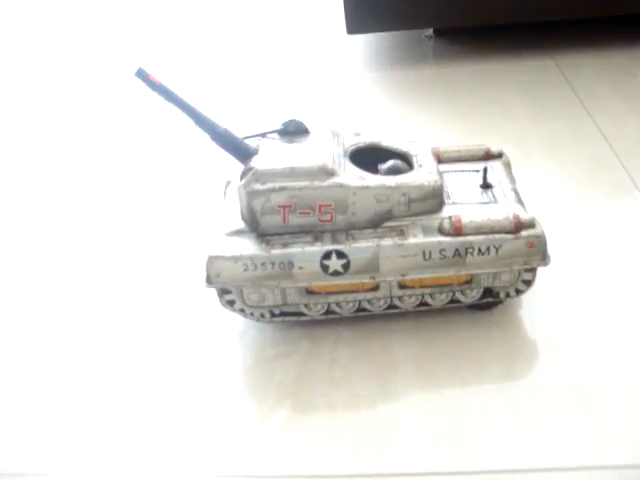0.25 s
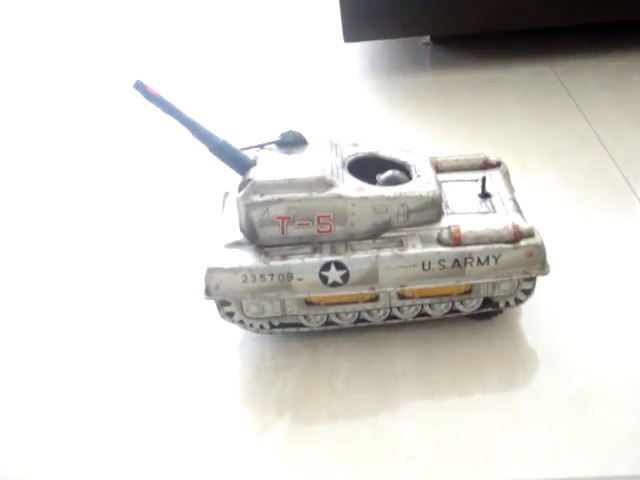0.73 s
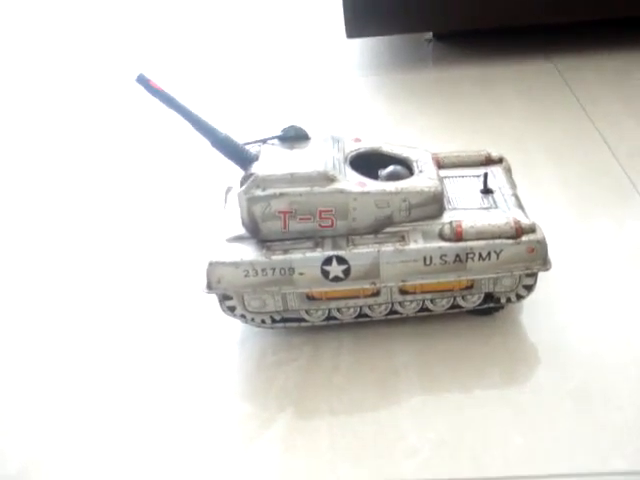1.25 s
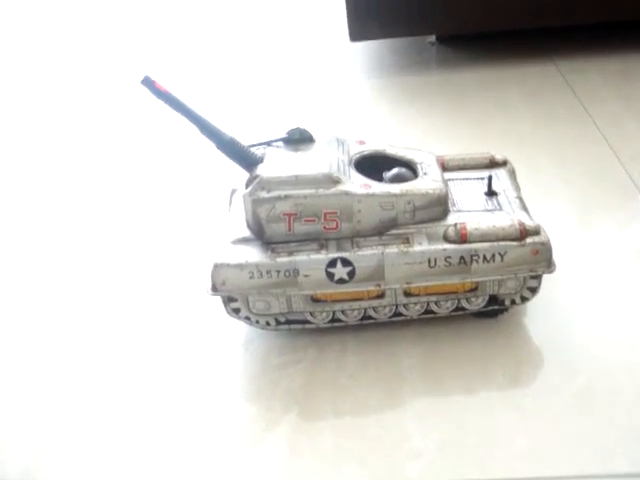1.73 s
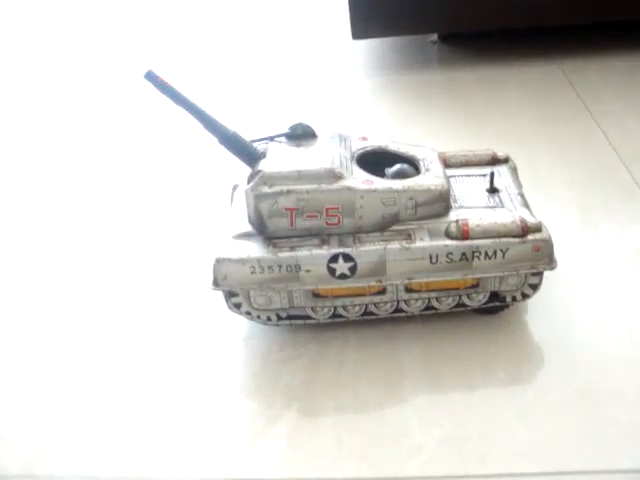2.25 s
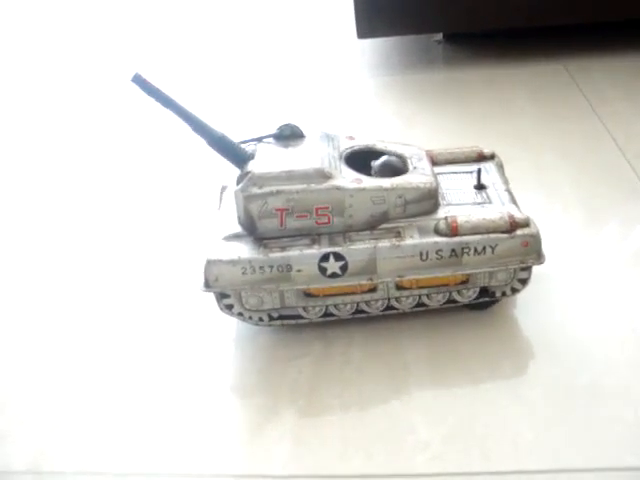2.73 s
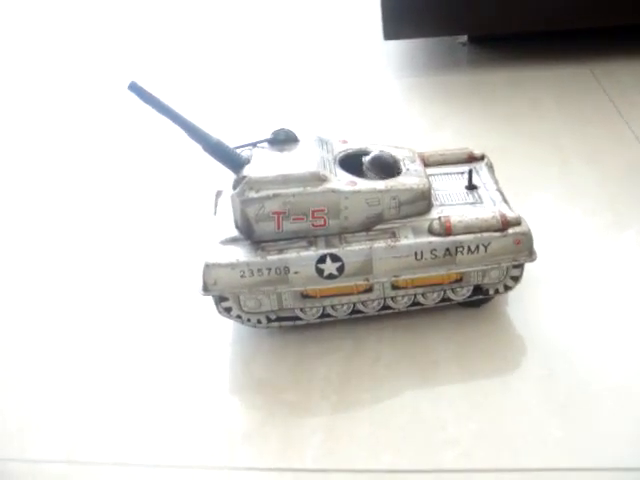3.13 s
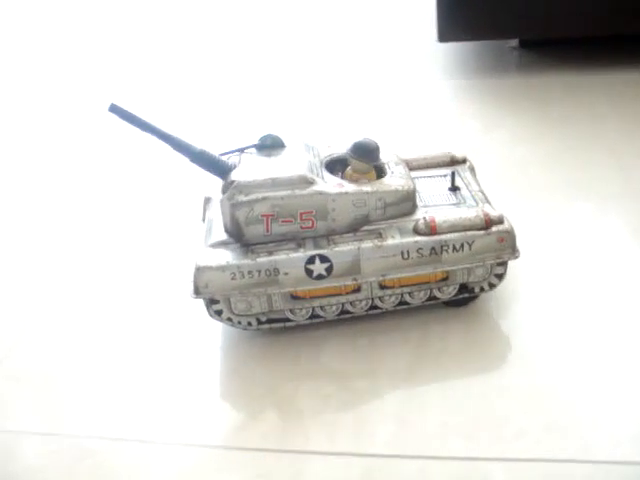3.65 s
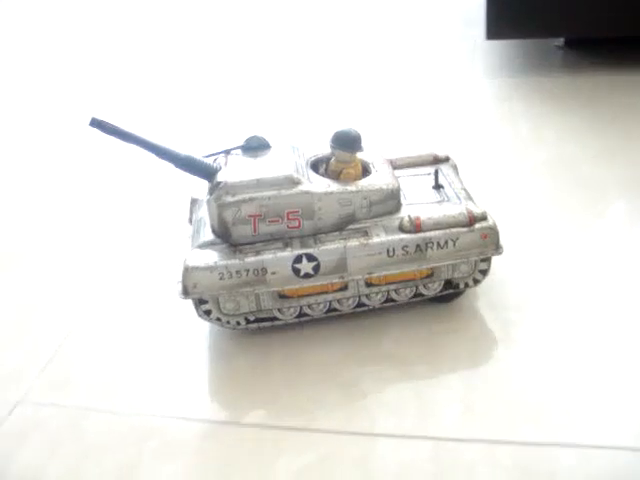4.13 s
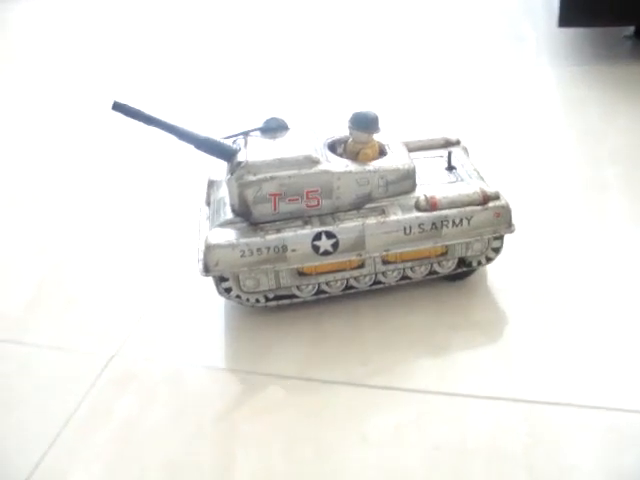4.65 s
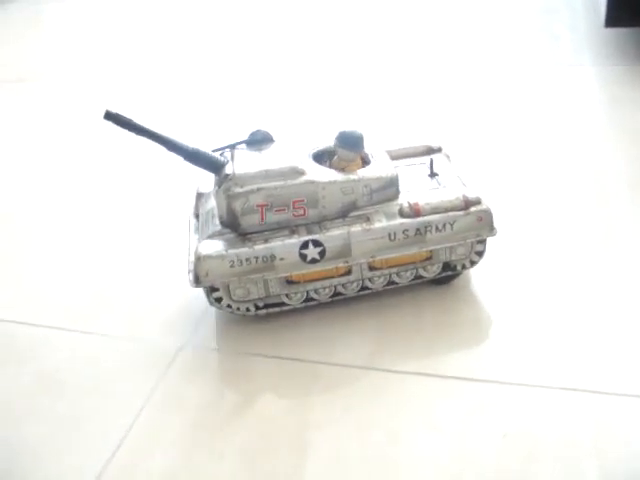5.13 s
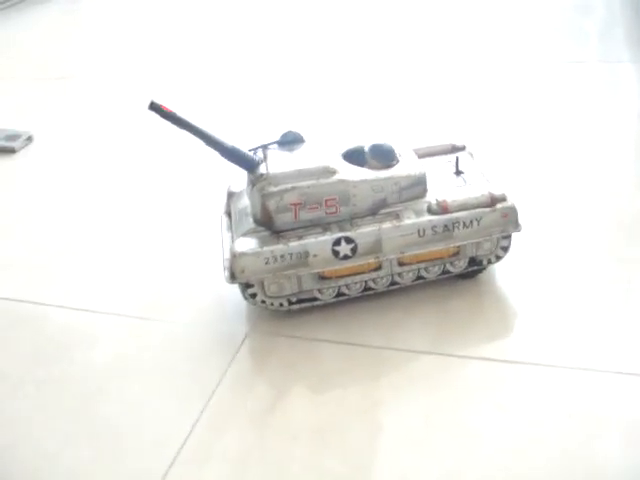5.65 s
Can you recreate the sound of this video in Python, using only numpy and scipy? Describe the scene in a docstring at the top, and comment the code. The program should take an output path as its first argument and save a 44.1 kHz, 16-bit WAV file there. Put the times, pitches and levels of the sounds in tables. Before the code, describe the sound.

A wind-up tin tank runs on a hard floor, miked very close in a quiet room with faint rumble. About sixteen bright ratchet clicks a second ring in the hollow hull, then lift off; after a brief lull, raspy gears whirr louder and louder with a wavering whine, dip with a small clunk, recover, and the loud clicking returns.

```python
"""A tin toy tank drives over a hard floor, close to a small microphone in a room with a faint rumble.
At first a pawl snaps against the tin hull about sixteen times a second, exciting its damped modes.
Then it lifts off with a clunk; gears rasp free and whirr, a noise of tooth contacts growing ever louder.
A wheel whines at its tooth rate and the hull bumps softly; the drive clunks and slackens briefly.
At last the pawl catches again, hard enough to overload the microphone."""
import sys
import numpy as np
from scipy import signal
from scipy.fft import rfft, irfft, next_fast_len
from scipy.io import wavfile
from scipy.ndimage import uniform_filter1d, map_coordinates

SR = 44100
rng = np.random.default_rng(int(sys.argv[2]) if len(sys.argv) > 2 else 0)


def int16_out(signal):
    """Quantize to a 16-bit WAV file."""
    q = np.round(np.clip(np.atleast_2d(signal).T, -1, 1) * 32767)
    wavfile.write(sys.argv[1], SR, q.astype(np.int16))


N = 260180
TOP_HZ = 10080  # upper band limit of the microphone


def amp(db):
    """The decibel law: a level in dB becomes an amplitude gain."""
    return 10 ** (np.asarray(db) / 20)


def unit(x):
    """Normalisation by effective value: x at rms 1."""
    return x / np.sqrt(np.mean(x ** 2) + 1e-20)


def along(points, hz):
    """Logarithmic frequency scale: interpolates (frequency [Hz], value) points at hz."""
    f, v = np.transpose(points)
    return np.interp(np.log(hz + 1), np.log(f + 1), v)


def wobble(rate):
    """Band-limited fluctuation: a smooth random curve with rate knots a second."""
    knots = rng.standard_normal(int(N * rate / SR) + 4)
    return map_coordinates(knots, [np.arange(N) * rate / SR])


def filtered(x, response):
    """Linear filtering: the spectrum of x times a response of frequency."""
    m = next_fast_len(len(x) + 4096)
    hz = np.fft.rfftfreq(m, 1 / SR)
    return irfft(rfft(x, m) * response(hz), m)[:len(x)]


def resonance(hz, centre, width):
    """Damped resonance: the complex response of one mode."""
    return 1j * hz * width / (centre ** 2 - hz ** 2 + 1j * hz * width)


def body(modes, hz):
    """Modal superposition: (frequency [Hz], width [Hz], level [dB]) modes summed with alternating sign."""
    return sum((-1) ** k * amp(db) * resonance(hz, c, w) for k, (c, w, db) in enumerate(modes))


def add(track, s, sound):
    """Superposition in time: mixes a sound into the track from time s on."""
    start = int(np.clip(round(s * SR), 0, N))
    track[start:start + len(sound)] += sound[:N - start]


def ramp(start, length):
    """Linear transition: rises from 0 to 1 over length seconds."""
    return np.clip((np.arange(N) / SR - start) / length, 0, 1)


def travelling(x, patch_db):
    """Moving interference: narrow bands lift and sink, as reflections shift while the toy moves."""
    z = signal.stft(x, nperseg=2048)[2]
    field = uniform_filter1d(rng.standard_normal(z.shape), size=3, axis=0)  # smooth over frequency
    field = uniform_filter1d(field, size=11, axis=1)  # smooth over time
    return unit(signal.istft(z * amp(patch_db * unit(field)), nperseg=2048)[1][:N])


# low rumble of the room and the rolling toy: (frequency [Hz], spectral level [dB per Hz])
RUMBLE_SPECTRUM = [(25, 3), (55, 3.5), (90, -2.5), (170, 0), (450, -0.5), (1000, -31), (4000, -28.5)]


def room(room_db=-70):
    """Stationary noise: the faint, steady rumble of the room."""
    noise = rng.standard_normal(N)
    return amp(room_db) * unit(filtered(noise, lambda hz: amp(along(RUMBLE_SPECTRUM, hz))))


# the drive slackens once: (start [s], fall [s], recovery [s], depth [dB])
SLACKENING = (5.35, 0.08, 0.25, 8.5)


def slack():
    """Transient loss of drive: how far the drive has slackened (dB)."""
    start, fall, recovery, depth_db = SLACKENING
    return depth_db * (ramp(start, fall) - ramp(start + fall, recovery))


# the pawl lifts off, the gears run free, the pawl catches again (s); time to change state (s)
LIFT_S, FREE_S, CATCH_S, ENGAGE_S = 2.3, 2.481, 5.69, 0.007
# tooth hiss while the pawl holds the gears, while they coast unloaded, as they start to run free (dB)
HELD_DB, COAST_DB, FREE_DB = -58, -42.5, -30.5
SWELL_DB_PER_S = 4.5  # growth of the hiss in the free run, up to the slackening
BRAKE_DB = -5  # the returning pawl slows the gears
# hull drone: level before and at the start of the free run (dB), growth, share of the slackening
DRONE_HELD_DB, DRONE_FREE_DB, DRONE_DB_PER_S, DRONE_SLACK = -45.5, -44.5, 4.5, 0.34
# share of hard running: under the pawl's load, once it has lifted, and growth per second of free run
EFFORT_HELD, EFFORT_FREE, EFFORT_PER_S = 1, 0.041, 0.05


def running():
    """Load dependence: tooth hiss (dB), hull drone (dB) and effort in each state of the gears."""
    run_s = np.clip(np.arange(N) / SR - FREE_S, 0, SLACKENING[0] - FREE_S)
    lifted, free, caught = ramp(LIFT_S, ENGAGE_S), ramp(FREE_S, ENGAGE_S), ramp(CATCH_S, ENGAGE_S)
    slack_db = slack()
    idle_db = HELD_DB + (COAST_DB - HELD_DB) * lifted
    hiss_db = (1 - free) * idle_db + free * (FREE_DB + SWELL_DB_PER_S * run_s) - slack_db
    free_drone_db = DRONE_FREE_DB + DRONE_DB_PER_S * run_s
    hull_db = (1 - free) * DRONE_HELD_DB + free * free_drone_db - DRONE_SLACK * slack_db
    effort = (1 - lifted) * EFFORT_HELD + lifted * (EFFORT_FREE + EFFORT_PER_S * run_s)
    return hiss_db + BRAKE_DB * caught, hull_db + BRAKE_DB * caught, np.clip(effort, 0, 1)


def teeth(rate=7000, spread_db=-0.5):
    """Shot noise: countless tiny tooth contacts of uneven size, rate a second on average."""
    hit = rng.random(N) < rate / SR
    return unit(hit * rng.standard_normal(N) * amp(spread_db * rng.standard_normal(N)))


# gear colour when running lightly: (frequency [Hz], spectral level [dB per Hz])
LIGHT_COLOUR = [(650, -48), (1100, -13), (1480, -15), (1860, -8.5), (2390, -11.5), (2900, -11.5),
                (4080, -9.5), (4650, -8.5), (5050, -7.5), (6480, -6.5), (8160, -4), (9200, -6),
                (10000, -15.5), (13000, -60), (22000, -120)]
# gear colour when running hard: (frequency [Hz], spectral level [dB per Hz])
HARD_COLOUR = [(650, -24), (1100, -6), (1400, 6), (1520, -2.5), (1860, 5.5), (2040, -6), (2850, -1),
               (3460, 11), (4320, -6.5), (4650, -14.5), (6720, -4), (8390, -21), (10000, -11), (13000, -43),
               (22000, -120)]
# tin panel resonances under the gears: (frequency [Hz], width [Hz], lift [dB])
PANEL_MODES = [(2030, 42, -6), (3300, 96, -4), (4570, 280, 6.5), (5210, 160, 4.5), (6100, 200, 3.5),
               (8380, 110, 6)]
# the hollow of the hull: (frequency [Hz], width [Hz], level [dB])
HOLLOW_MODES = [(294, 90, -22.5), (601, 38, -8.5), (678, 36, -10), (752, 69, -9), (827, 53, -1),
                (905, 99, -2.5), (1050, 46, -5.5)]


def gears(light_db=0, hard_db=0, drone_db=-1, rumble_db=-35, flutter_db=0.5, grain_db=0.7):
    """Forced vibration: tooth contacts excite the panels and hollow of the hull, fuller when running hard."""
    hiss_db, hull_db, effort = running()

    def panels(hz):
        return amp(sum(db * np.abs(resonance(hz, c, w)) ** 2 for c, w, db in PANEL_MODES))

    contacts = filtered(travelling(teeth() + rng.standard_normal(N), patch_db=3.0), panels)
    light = unit(filtered(contacts, lambda hz: amp(along(LIGHT_COLOUR, hz))))
    hard = unit(filtered(contacts, lambda hz: amp(along(HARD_COLOUR, hz))))
    mesh = amp(light_db) * (1 - effort) * light + amp(hard_db) * effort * hard
    hull = travelling(filtered(teeth(), lambda hz: body(HOLLOW_MODES, hz)), patch_db=4.0)
    rumble = filtered(rng.standard_normal(N), lambda hz: amp(along(RUMBLE_SPECTRUM, hz)))
    rumble = travelling(rumble, patch_db=3.0)
    uneven_db = flutter_db * wobble(60) + grain_db * wobble(320)  # the wheels do not run quite true
    sound = amp(hiss_db + uneven_db) * mesh
    sound += amp(hull_db + drone_db) * hull
    return sound + amp(hiss_db + rumble_db) * rumble


# steady tones that sing while the wheels run: (frequency [Hz], level against the drone's running level [dB])
HUM_TONES = [(300, -26), (609, -16), (820, -7.5), (1052, -16), (1906, -11.5), (4570, -17), (5180, -29.5)]


def hum(drift=0.005, waver_db=3):
    """Sustained tones: while the wheels run, a few steady tones sing, wavering in pitch and level."""
    _, hull_db, _ = running()
    out = np.zeros(N)
    for hz, db in HUM_TONES:
        level = amp(hull_db + db + waver_db * wobble(12))
        phase = 2 * np.pi * np.cumsum(hz * (1 + drift * wobble(9))) / SR
        out += level * np.sqrt(2) * np.sin(phase)
    return out


# the pawl drops off a tooth; levels are against a typical snap:
# (time [s], hollow clack [dB], mid ping [dB], treble crack [dB], afterring [dB])
PAWL_SNAPS = [(0.0063, 1.5, -2, 3.5, 8), (0.0634, 1, 4, 3, 4.5), (0.1233, 6, 2, 2.5, 4),
              (0.185, 3.5, 2.5, 4, 6.5), (0.2472, 2, 1, 3.5, 5), (0.3081, 2.5, 1, 2, 2),
              (0.3697, 2.5, -5.5, 2, 6.5), (0.4345, 3.5, -2, 3.5, 5), (0.4982, -0.5, -3.5, 3.5, 5.5),
              (0.5681, 0, -3, 2.5, 2), (0.6308, -2.5, 2.5, 1.5, 0.5), (0.6958, -1.5, -4.5, 4, 3.5),
              (0.757, -2, -4, 4, 3.5), (0.8285, 0, 1, 3.5, 3), (0.8879, -0.5, -4.5, 1.5, 1.5),
              (0.9598, -0.5, -3, 3, 1), (1.0231, -1.5, -6, 4.5, 2), (1.0959, 0, -1.5, 3.5, -1.5),
              (1.1536, -3.5, -1, 2, 3), (1.221, -0.5, -1.5, 1.5, -5), (1.2783, -3.5, 5.5, 1.5, 2.5),
              (1.338, -2.5, -3, 5, 3), (1.393, -2.5, 5.5, 1.5, -8), (1.45, -2, -2.5, 2.5, 2),
              (1.5125, -2, 2, 1, -0.5), (1.5703, -2, 1, 1.5, -0.5), (1.6295, -3, 2, 2, 2.5),
              (1.6872, -4.5, 1, 3.5, -6), (1.746, -3.5, 0.5, 3, -2.5), (1.8062, -5, 3.5, 0.5, 2),
              (1.871, -4, -2.5, 5, 1), (1.928, -2, 0.5, 1, -8.5), (1.997, -2.5, 1.5, 1.5, 0),
              (2.0521, -4, -0.5, 2, 0), (2.1185, -1.5, 2.5, 2.5, -4), (2.179, -1, -0.5, 3, -3.5),
              (2.2493, -2, -0.5, 3, 0.5), (2.301, -25.5, -17, -8.5, -4.5), (5.6933, 7.5, 0, 5.5, 8),
              (5.7563, 7, 1, 5.5, 9), (5.826, 4.5, -2, 2, 4.5), (5.8918, 4.5, 0.5, 4, -4)]
# what a snap rings in the tin: (frequency [Hz], level [dB], t60 [s])
TIN_MODES = [(809.4, 0.5, 0.028), (923, -5, 0.057), (1188, -5.5, .045), (1473, -24, 0.14),
             (1683, -1.5, 0.048), (1813, -13, 0.12), (2085, -10.5, 0.08), (2414, 8, 0.015),
             (3047, -6, 0.05), (3824, -5.5, 0.055), (3970, 8, 0.016), (4635, -1, 0.0097), (4980, 1, 0.027),
             (5367, 3.5, 0.017), (6400, 15.5, 0.0082), (6650, 14, 0.01), (7160, 8, 0.0092),
             (7860, 5, 0.012), (8420, -3.5, 0.021), (9043, 3, 0.013)]
# the dry crack of the contact itself: (frequency [Hz], spectral level [dB per Hz])
CRACK_SPECTRUM = [(400, -29.5), (1400, -36), (2200, -3), (3200, -5), (4100, -1), (5800, 0.5), (6600, 5),
                  (7500, 2.5), (8700, 4.5), (10000, -12)]
# centres of the knock (which follows the clack by half), clack, ping and crack: (frequency [Hz])
BAND_CENTRES = [1000, 2250, 3950, 5300]
SNAP_DB = -2.5  # gain of all snaps
CLACK_HZ, CLACK_PEAK_S, CLACK_DB = 2200, 0.001, -4.3  # the struck plate clacks for a few cycles only
CRACK_T60_S, CRACK_RISE_S, RING_RISE_S = 0.027, 0.0011, 0.0008
# the lowest tin modes build up over about this many cycles and bloom late; the others share RING_RISE_S
BLOOM_CYCLES = 0.86
PUSH_TIME_S, PUSH_DB = 0.00018, -20


def pawl(lead=0.0036, onset_db=-17.5, onset_fade=0.00084, crack_db=-2, ring_db=-14.0,
         scatter=0.16, detune=0.009):
    """Impact excitation: a soft noisy onset, then clack, crack, ringing tin modes and a push of air."""
    out, t = np.zeros(N), np.arange(SR // 20) / SR
    hz, mode_db, t60 = np.transpose(TIN_MODES)[:, :, None]
    flip = np.arange(len(TIN_MODES))[:, None] / 2  # neighbouring modes start in opposite directions
    swell = (t / CLACK_PEAK_S * np.exp(1 - t / CLACK_PEAK_S)) ** 3
    for s, clack_db, ping_db, treble_db, _ in PAWL_SNAPS:

        def colour(f):
            return np.interp(f, BAND_CENTRES, [clack_db / 2, clack_db, ping_db, treble_db])

        def rasp():
            noise = filtered(rng.standard_normal(len(t)), lambda f: amp(along(CRACK_SPECTRUM, f)))
            return filtered(unit(noise), lambda f: amp(colour(f)))

        # every tooth lets go a little differently: levels scatter alike, phases most in the high modes
        level = amp(mode_db + colour(hz) + 1.0 * rng.standard_normal(hz.shape) - 60 * t / t60)
        slip = scatter * hz / 3000 * rng.standard_normal(hz.shape)
        mode_hz = hz * (1 + detune * rng.standard_normal(hz.shape))
        phase = 2 * np.pi * (mode_hz * t + flip + slip)
        bloom = (1 - np.exp(-t / np.maximum(RING_RISE_S, BLOOM_CYCLES / hz))) ** 2
        ring = np.sum(level * bloom * np.sin(phase), axis=0)
        ring = filtered(ring, lambda f: f ** 4 / (f ** 4 + 600 ** 4))  # little below 600 Hz
        clack = amp(CLACK_DB + clack_db) * swell * np.sin(2 * np.pi * (CLACK_HZ * t + rng.random()))
        crack = amp(crack_db - 60 * t / CRACK_T60_S) * (1 - np.exp(-t / CRACK_RISE_S)) ** 2 * rasp()
        push = amp(PUSH_DB + clack_db) * t / PUSH_TIME_S * np.exp(1 - t / PUSH_TIME_S)
        add(out, s, clack + amp(ring_db) * ring + crack + push)
        onset = amp(onset_db) * rasp() * np.exp(-np.abs(t - lead) / onset_fade)
        add(out, s - lead, onset)  # the onset noise peaks as the pawl strikes
    return amp(SNAP_DB) * out


def thumps(thump_db=-52, growth=3.55, rise=0.0011, fade=0.02):
    """Overload bias: a low thump of the overloaded microphone rises growth dB per dB of clack."""
    out, t = np.zeros(N), np.arange(SR // 8) / SR
    for s, clack_db, *_ in PAWL_SNAPS:
        offset = (1 - np.exp(-t / rise)) * np.exp(-t / fade)
        add(out, s, amp(thump_db + growth * clack_db) * offset)  # so hard snaps thump most
    return out


# the lingering ring of hull and room: (frequency [Hz], spectral level [dB per Hz])
LINGER_SPECTRUM = [(100, -39), (450, -23), (680, -9.5), (830, -5), (1060, -9), (1400, 1.5), (2200, -1.5),
                   (3200, -2), (3900, 4.5), (4800, 2), (6500, 1), (7800, -4.5), (8700, -12), (10000, 4.5)]
# its decay: (frequency [Hz], t60 [s])
LINGER_DECAY = [(300, 0.26), (830, 0.44), (2000, 0.58), (5000, 0.12), (10000, 0.12)]
# the slowest modes of the hull, which sing on from snap to snap: (frequency [Hz], level [dB], t60 [s])
SINGING_MODES = [(602.5, -42.5, 0.14), (815, -31, 0.2), (899, -41, 0.45), (1220, -42, .25),
                 (1373, -43, 0.26), (1780, -40, 0.2), (2120, -40.5, .22), (2210, -65, .2), (3140, -44, .25)]


def afterring(linger_db=-25, count=600, spread_db=2, scatter=0.33):
    """Free decay: each snap wakes the slowest hull modes and the same thicket of weak hull and room modes."""
    out, t = np.zeros(N), np.arange(SR // 5) / SR
    places = (np.arange(count) + rng.random(count)) / count
    hz = 100 + (TOP_HZ - 100) * places ** 1.3
    gain = amp(along(LINGER_SPECTRUM, hz) + spread_db * rng.standard_normal(count))
    gain = gain * np.sqrt(np.gradient(hz))  # each mode stands for the band around it
    decay = np.log(1000) / along(LINGER_DECAY, hz)
    modes = np.exp(np.outer(2j * np.pi * hz - decay, t).astype(np.complex64))
    # low modes answer nearly alike every time; high ones feel each small shift of the toy
    turns = rng.random(count) + scatter * hz / 3000 * rng.standard_normal((len(PAWL_SNAPS), count))
    starts = gain / np.linalg.norm(gain) * np.exp(2j * np.pi * turns)
    tails = (starts.astype(np.complex64) @ modes).real
    sing_hz, sing_db, sing_t60 = np.transpose(SINGING_MODES)[:, :, None]
    fading = amp(sing_db - 60 * t / sing_t60)
    for (s, *_, db), tail in zip(PAWL_SNAPS, tails):
        phase = 2 * np.pi * (sing_hz * t + rng.random(sing_hz.shape))
        singing = np.sum(fading * np.sin(phase), axis=0)
        add(out, s, amp(db + linger_db) * np.sqrt(2) * tail + amp(db / 2) * singing)
    return out


def rattle(count=10, tick_db=-29, first=0.0054, last=0.058, fade_db_per_s=110, tick_hz=2800,
           spread=0.375, t60=0.016, rise=0.0003):
    """Secondary impacts: loose tin parts clatter on from one snap to the next, each tick three modes."""
    out, t = np.zeros(N), np.arange(SR // 50) / SR
    for s, *_, after_db in PAWL_SNAPS:
        for delay in rng.uniform(first, last, count):
            hz = tick_hz * np.exp(spread * rng.standard_normal((3, 1)))
            uneven_db = rng.uniform(-6, 6)
            db = tick_db + after_db - fade_db_per_s * delay + uneven_db
            ring = np.sin(2 * np.pi * (hz * t + rng.random(hz.shape))).sum(axis=0)
            add(out, s + delay, amp(db - 60 * t / t60) * (1 - np.exp(-t / rise)) ** 2 * ring)
    return out


# far walls throw the snap back: (delay [s], level [dB])
WALL_ECHOES = [(0.0253, -17.5), (0.0363, -46)]
# colour of those echoes: (frequency [Hz], level [dB])
WALL_COLOUR = [(800, -8), (2200, -4.5), (3900, 5), (6000, -4), (10000, -1)]


def echoes(x):
    """Discrete reflection: the snaps come back once from each far wall, delayed and coloured."""
    def walls(hz):
        delayed = sum(amp(db) * np.exp(-2j * np.pi * hz * s) for s, db in WALL_ECHOES)
        return amp(along(WALL_COLOUR, hz)) * delayed

    return filtered(x, walls)


# contacts of the mechanism letting go: (time [s], level [dB])
CLUNK_CONTACTS = [(2.301, -27), (5.349, -18), (5.361, -21.5), (5.372, -17.5)]
# what the clunk rings: (frequency [Hz], width [Hz], level [dB])
CHASSIS_MODES = [(392, 91, -4), (580, 91, 0.5), (880, 270, -1.5), (1300, 33, 7), (1980, 600, -3)]


def clunk(t60=0.044):
    """Modal filtering: loose contacts shake the whole chassis as the pawl lifts or the drive slackens."""
    out, t = np.zeros(N), np.arange(SR // 8) / SR
    chassis = lambda hz: body(CHASSIS_MODES, hz)
    for s, db in CLUNK_CONTACTS:
        shake = rng.standard_normal(len(t))
        ring = filtered(shake * amp(-60 * t / t60), chassis)
        add(out, s, amp(db) * ring / np.std(filtered(shake, chassis)))
    return out


# the gears bite as they come free: (time [s], level [dB])
GEAR_BITES = [(2.483, -25), (2.502, -25)]


def bites(t60=0.035, rise=0.001):
    """Frictional noise bursts: short rasps of the teeth as the gears start to run free."""
    out, t = np.zeros(N), np.arange(SR // 20) / SR
    for s, db in GEAR_BITES:
        rasp = unit(filtered(rng.standard_normal(len(t)), lambda hz: amp(along(LIGHT_COLOUR, hz))))
        add(out, s, rasp * amp(db - 60 * t / t60) * (1 - np.exp(-t / rise)))
    return out


# the fastest wheel frees itself, then sags under load: (time [s], tooth rate [Hz], level [dB])
WHEEL_WHINE = [(4.08, 820, -58.5), (4.159, 824, -34), (4.21, 835, -37), (4.27, 822, -47),
               (4.42, 843.5, -37.5), (4.499, 817, -32.5), (4.53, 890, -35), (4.6, 904, -32.5),
               (4.68, 894, -34.5), (4.76, 911.7, -31.5), (4.91, 904, -36.5), (5.0, 907, -32),
               (5.15, 908, -39), (5.22, 905, -30.5), (5.36, 890, -40), (5.43, 885, -63), (5.571, 870, -44),
               (5.66, 856, -30.5), (5.72, 834, -37)]
SLOW_WHEEL_RATIO = 3 / 4  # tooth rate of the next wheel over that of the fastest


def whine(slow_wheel_db=-14, flutter=0.004, waver_db=1.0):
    """Tooth-mesh tone: the fastest wheel sings at its tooth rate; the next sings faintly below it."""
    s, hz, db = np.transpose(WHEEL_WHINE)
    t = np.arange(N) / SR
    phase = 2 * np.pi * np.cumsum(np.interp(t, s, hz) * (1 + flutter * wobble(50))) / SR
    tones = np.sin(phase) + amp(slow_wheel_db) * np.sin(SLOW_WHEEL_RATIO * phase)
    return amp(np.interp(t, s, db) + waver_db * wobble(22)) * np.sqrt(2) * tones


# the rolling hull bumps on its tracks: (time [s], level [dB])
HULL_BUMPS = [(4.13, -31), (4.49, -32), (4.872, -26)]
# what a bump rings: (frequency [Hz], width [Hz], level [dB])
UNDERSIDE_MODES = [(644, 60, -9), (800, 46, -3), (1040, 37, 1), (1180, 32, -6), (1660, 90, -9.5)]


def bumps(t60=0.38, rise=0.0024):
    """Soft impact: the rolling hull knocks dully, its underside modes colouring a decaying noise."""
    out, t = np.zeros(N), np.arange(SR // 4) / SR
    for s, db in HULL_BUMPS:
        shake = unit(filtered(rng.standard_normal(len(t)), lambda hz: body(UNDERSIDE_MODES, hz)))
        add(out, s, shake * amp(db - 60 * t / t60) * (1 - np.exp(-t / rise)))
    return out


def scene():
    """Linear superposition: all parts of the toy and the room, and the thumps, in mono."""
    snaps = pawl()
    steady = room() + gears() + hum()
    struck = snaps + thumps() + afterring() + rattle() + echoes(snaps)
    freed = clunk() + bites() + whine() + bumps()
    return (steady + struck + freed)[None]


def record(dry, top=1.0):
    """Saturation and band limiting: peaks overload the microphone; extreme bass and high treble are cut."""
    held = dry[0] / (1 + np.abs(dry[0] / top) ** 6) ** (1 / 6)

    def band(hz):
        bass_cut = 1j * hz / (1j * hz + 5)  # gentle, at 5 Hz
        return bass_cut / np.sqrt(1 + (hz / TOP_HZ) ** 300)  # very steep treble limit

    return filtered(held, band)[None]


dry = scene()
out = record(dry)
int16_out(out)
```